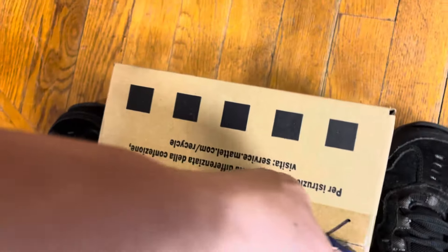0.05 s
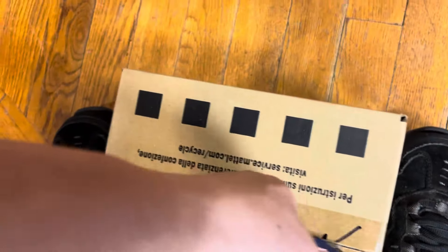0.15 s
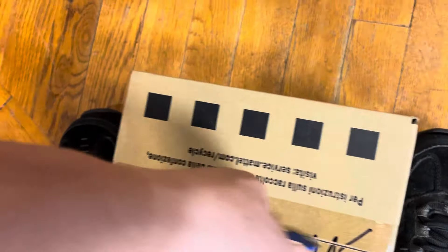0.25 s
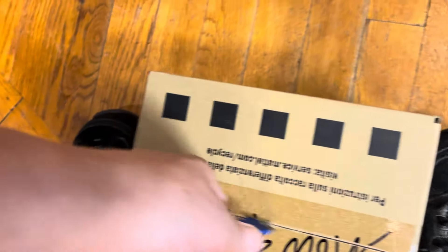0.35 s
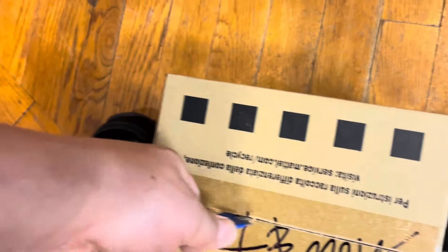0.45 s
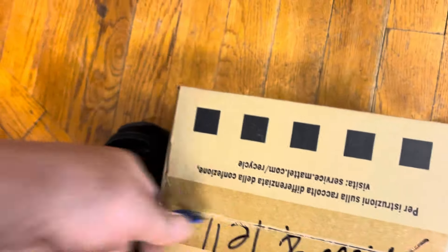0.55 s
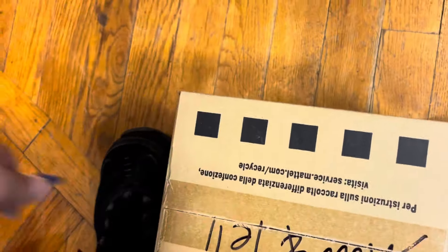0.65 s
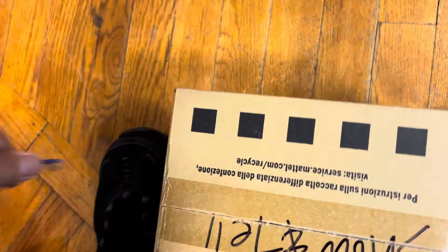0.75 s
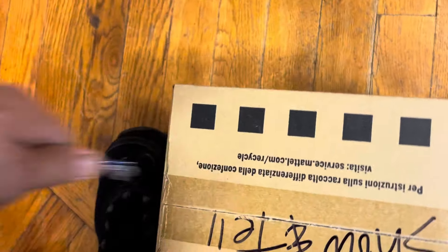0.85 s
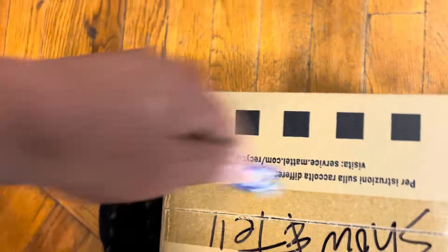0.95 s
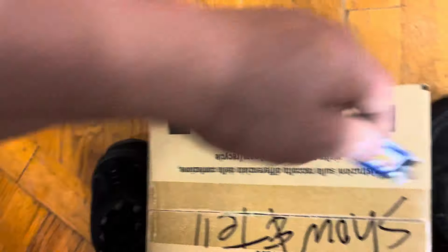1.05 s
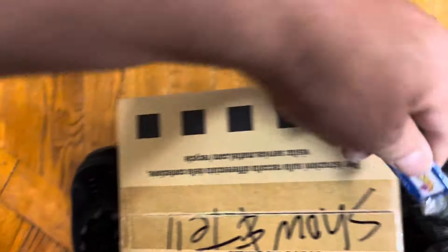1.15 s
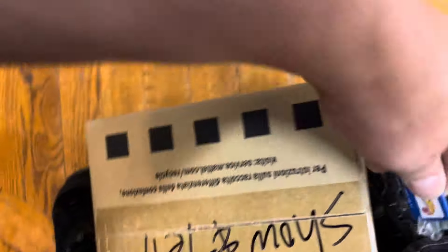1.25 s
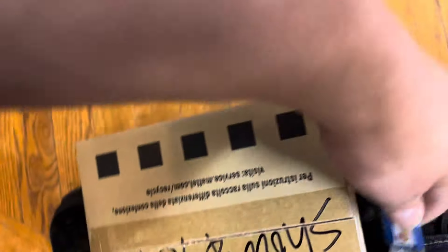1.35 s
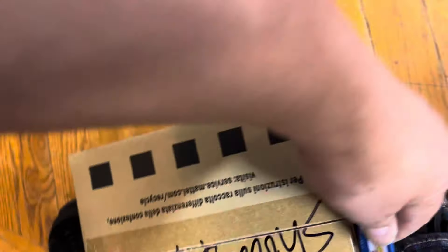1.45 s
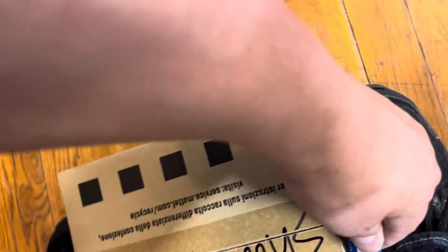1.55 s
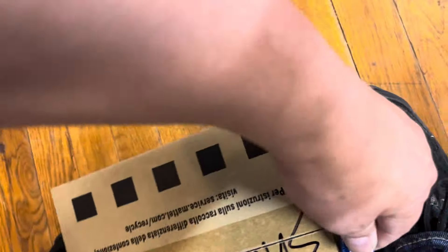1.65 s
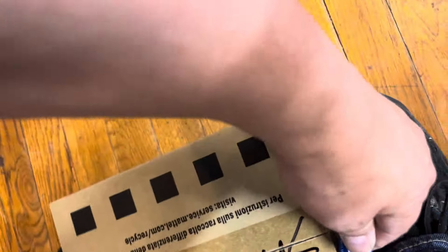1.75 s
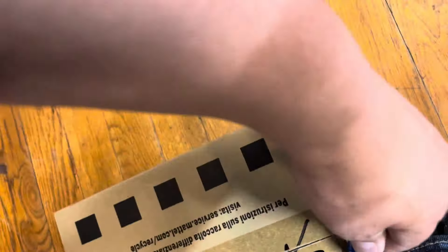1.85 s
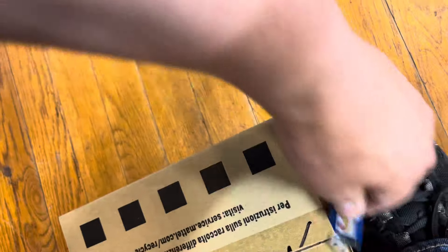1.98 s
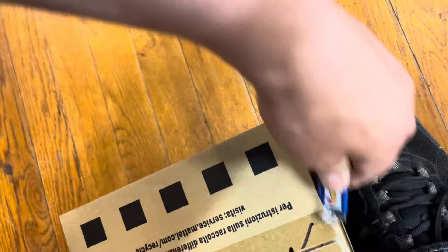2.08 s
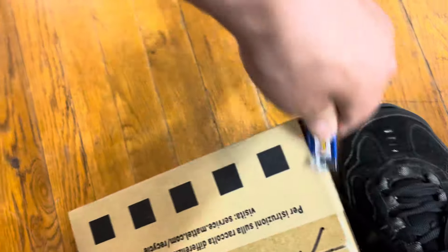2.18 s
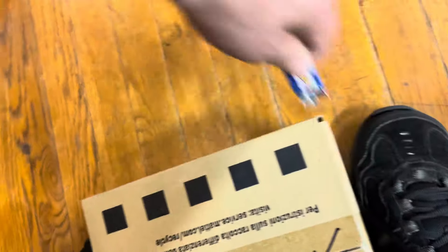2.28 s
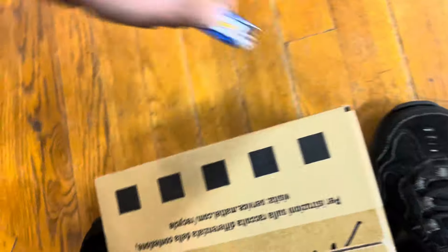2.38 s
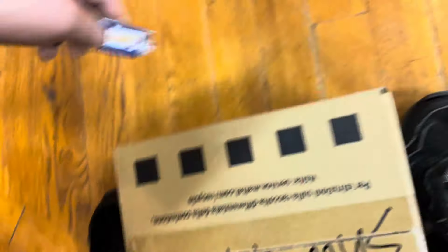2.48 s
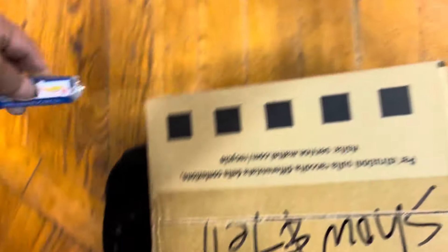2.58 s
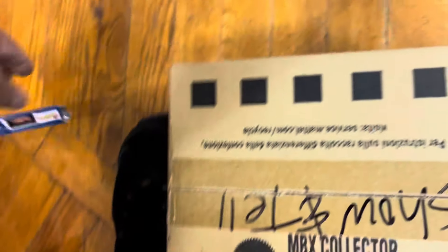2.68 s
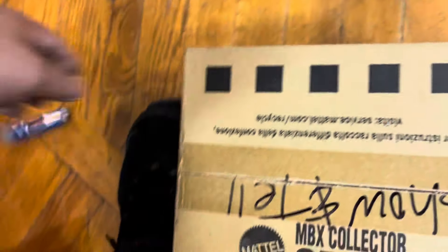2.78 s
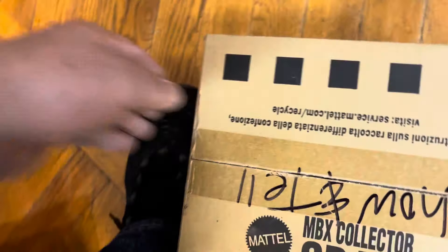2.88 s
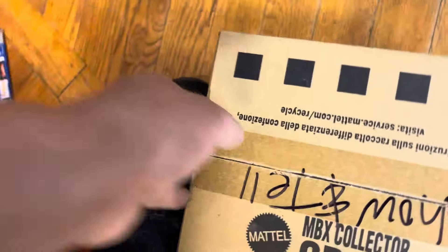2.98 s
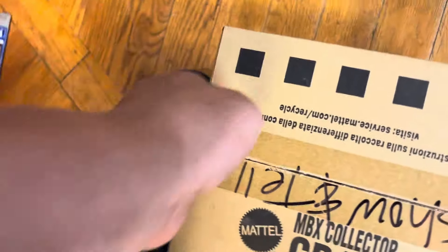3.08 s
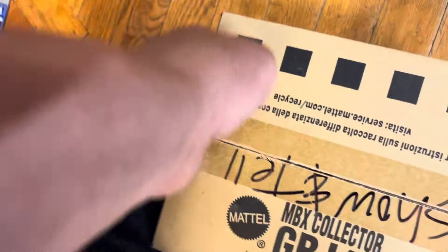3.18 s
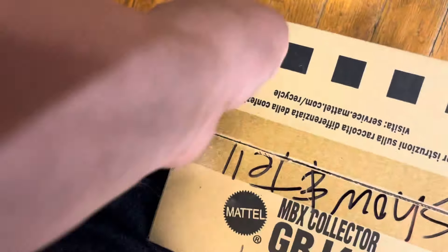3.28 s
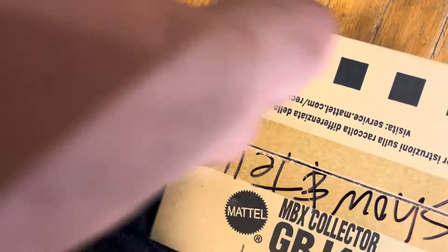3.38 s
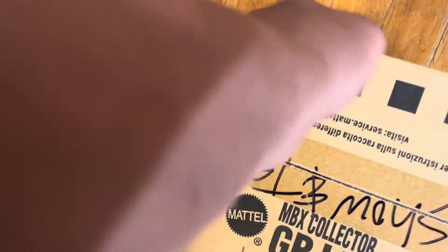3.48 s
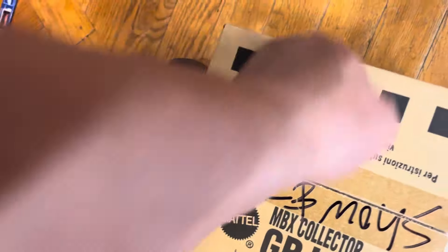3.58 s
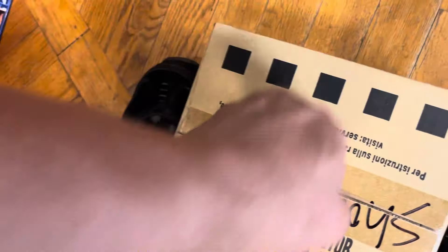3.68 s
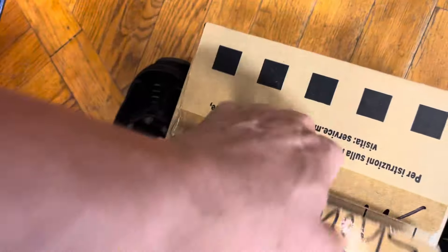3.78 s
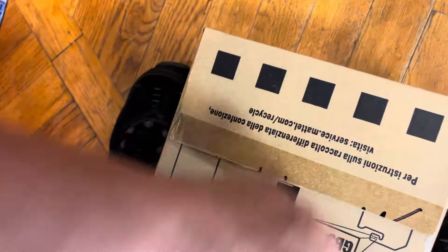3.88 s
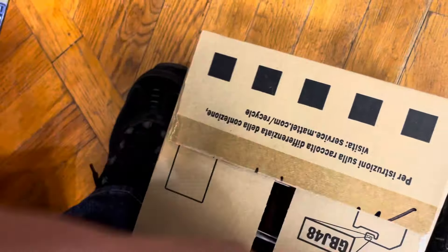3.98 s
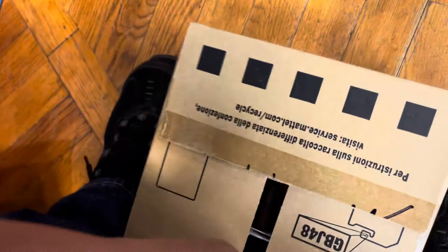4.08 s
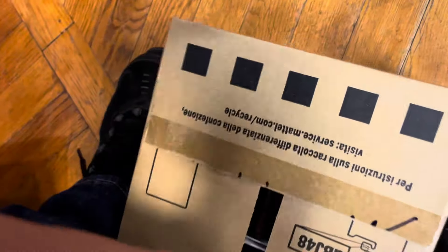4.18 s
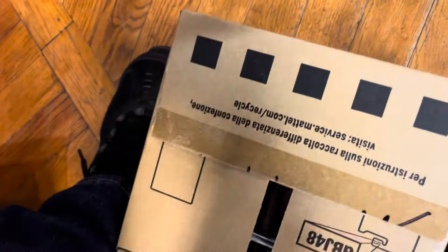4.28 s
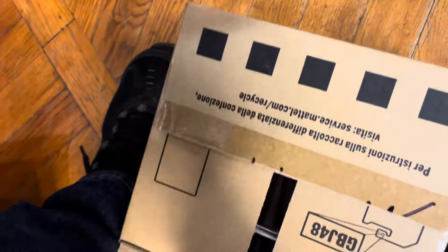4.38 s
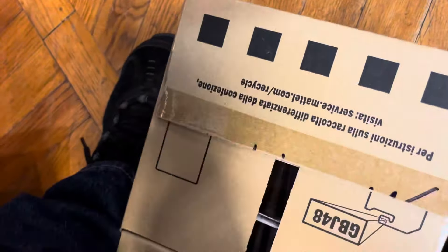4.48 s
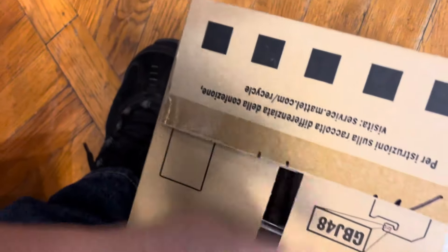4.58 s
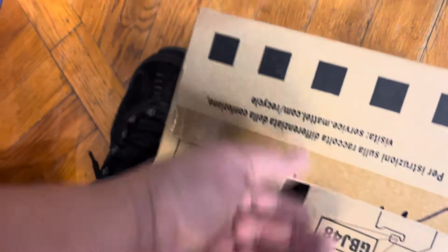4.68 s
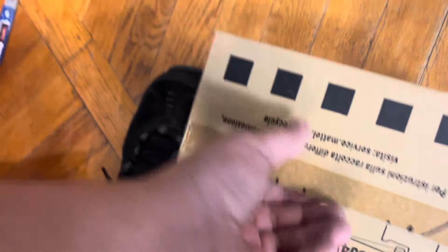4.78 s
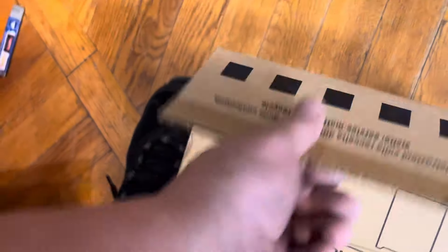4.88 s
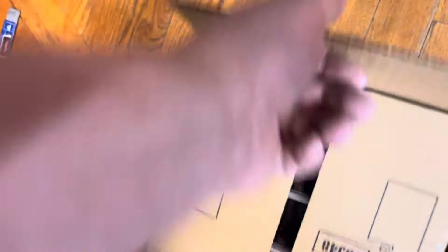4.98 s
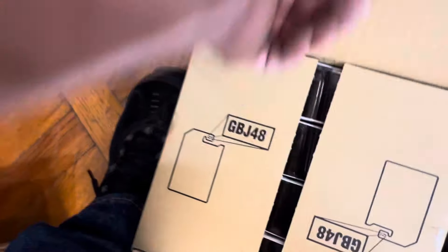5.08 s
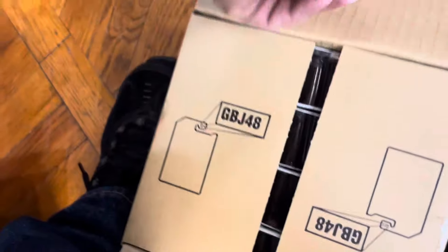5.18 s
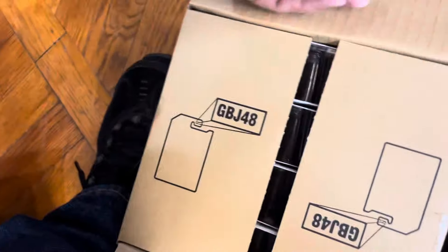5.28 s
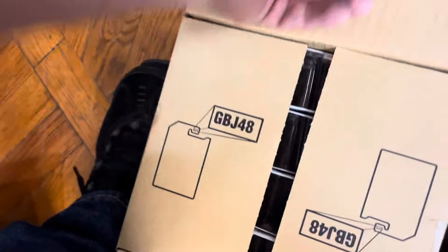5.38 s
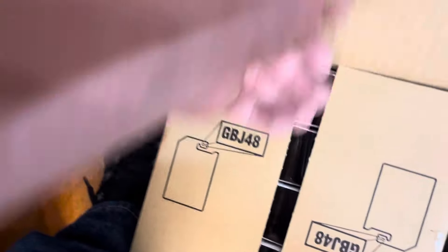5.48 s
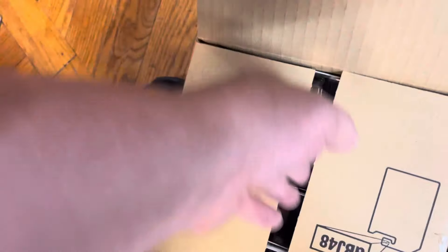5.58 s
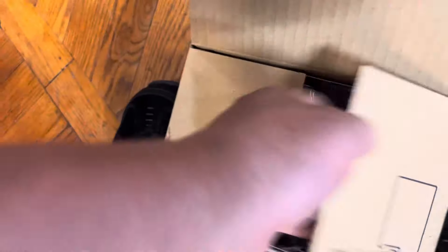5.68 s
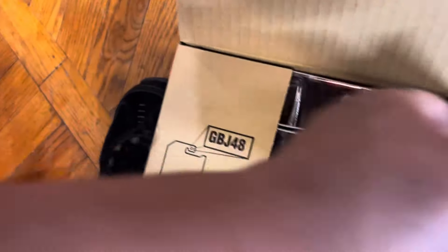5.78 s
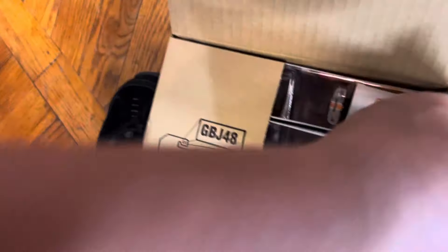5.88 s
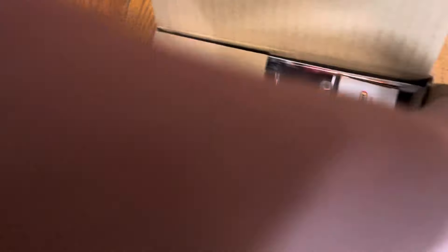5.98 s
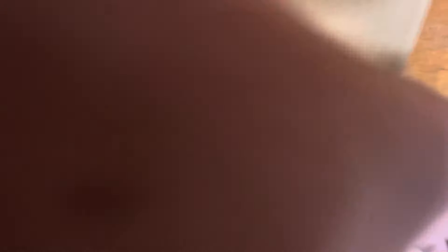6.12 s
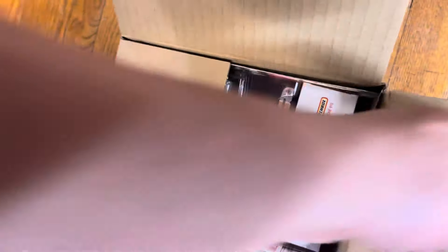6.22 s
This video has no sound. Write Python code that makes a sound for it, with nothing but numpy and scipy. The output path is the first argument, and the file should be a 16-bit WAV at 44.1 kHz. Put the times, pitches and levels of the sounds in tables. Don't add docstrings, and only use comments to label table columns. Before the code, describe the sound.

A short blade drags through carton tape with gritty scraping and sharp snaps, then hands tear and knock hollow cardboard flaps open in a quiet room.

```python
import sys
import numpy as np
from scipy import signal
from scipy.io import wavfile
from scipy.ndimage import uniform_filter1d

SR = 44100
rng = np.random.default_rng(int(sys.argv[2]) if len(sys.argv) > 2 else 0)


def wav_record(signal):
    frames = np.transpose(np.atleast_2d(signal))
    bounded = np.clip(frames, -1, 1)
    quanta = np.round(bounded * 32767).astype(np.int16)
    wavfile.write(sys.argv[1], SR, quanta)


def convert_level_to_amplitude(level_db):
    exponent = np.asarray(level_db, float) / 20
    return 10 ** exponent


N = 275620

# frequency in Hz, level in dB per Hz.
ROOM_TONE_DB_PER_HZ = [(18, -41), (30, -41), (43, -30), (68, 2), (93, -17), (122, -1), (148, -24.5),
                       (195, -16), (300, -26), (478, -50), (1140, -39.5), (1620, -26), (2270, -43.5),
                       (12600, -72.5), (16400, -72.5)]
# frequency in Hz, likeness from 0 to 1.
ROOM_TONE_LIKENESS = [(60, 1), (290, 0.76), (640, 0.3), (1400, 0.14), (3100, 0.23), (5500, 0.63),
                      (15000, 0.55)]

# frequency in Hz, width in Hz, level in dB.
CARTON_MODES = [(101.9, 16.6, 6), (139, 92, -2), (253, 88, 1.5), (277.6, 31.4, 4), (332, 35, -3.5),
                (412, 53, -5.5)]
# frequency in Hz, width in Hz, level in dB.
FLAP_MODES = [(543, 143, 4.5), (746, 108, 4.5), (947, 300, 0), (1280, 68, 3.5), (1480, 89, 0.5),
              (2590, 180, -17.5)]
# frequency in Hz, level in dB.
FIZZ_DB = [(1500, -58.5), (2000, -4), (2500, -1), (3200, 1), (4300, 1.5), (5600, -3.5), (7000, 0.5),
           (9000, -2), (12500, -6.5), (16000, -11.5), (16900, -39)]

# time in seconds, pressure in dB, lean into the hollow box in dB.
FIRST_CUT = [
    (0, -40, -0.5),
    (.15, -41.5, 3),
    (.23, -46, 14),
    (.31, -41.5, 14),
    (.42, -43.5, 16.5),
    (.5, -44, 9),
    (.59, -38, 9),
    (.625, -59, 17),
    (.96, -72.5, 12),
]
# time in seconds, pressure in dB, lean in dB.
SECOND_CUT = [
    (1.85, -63.5, 1),
    (1.95, -47, 7),
    (2.151, -41, 2),
    (2.268, -44.5, 11),
    (2.359, -70, 11),
    (2.739, -78, 21.5),
]
# time in seconds, pressure in dB, lean in dB.
HANDS = [(2.84, -46, 3), (2.95, -44.5, 8), (3.1, -61.5, 3), (3.25, -56.5, 12), (3.42, -59.5, -1),
         (3.58, -54.5, 13), (3.75, -59, 15.5), (3.98, -60.5, 8), (4.15, -50.5, 4), (4.471, -51, -12),
         (4.63, -57, 11.5), (5.2, -54.5, -12.5), (5.421, -53.5, -2), (5.46, -75, 17), (5.531, -94, 33),
         (5.701, -53, -7), (5.9, -46, -3), (6.25, -56.5, 4)]
# fizz over pressure in dB, top octave over fizz in dB.
DRAG_GRIT_DB = [
    (-5.5, -13),
    (-7.5, -13),
    (-3, -15),
]
# peak time in seconds, rise in seconds, fall in seconds, scrape in dB, squeak in Hz.
RUBS = [(0.29, 0.078, 0.017, -34.5, 3730), (1.584, 0.014, 0.003, -47, 800),
        (3.495, 0.055, 0.018, -57, 3600), (4.375, 0.027, .03, -28, 540), (4.57, 0.026, 0.025, -36.5, 1560),
        (4.3, 0.057, 0.023, -42, 550), (4.4, 0.013, 0.015, -35, 890), (2.252, .015, 0.02, -37, 480),
        (2, 0.0051, 0.0079, -49, 1000), (0.247, 0.055, 0.025, -38, 680), (5.78, 0.013, 0.011, -44, 1300),
        (6.191, 0.0083, 0.028, -51, 1070), (2.009, 0.041, 0.016, -45.5, 3800),
        (2.239, 0.02, 0.022, -63.5, 4170), (3.53, 0.003, 0.014, -39, 1000), (0.55, 0.04, 0.04, -38, 1300),
        (2.77, 0.025, 0.013, -46, 2600), (3.42, 0.056, 0.045, -58.5, 1520), (3.61, 0.015, .015, -60, 1350),
        (4.0, .04, 0.034, -64, 2000), (5.121, 0.0096, 0.017, -31, 1390), (5.843, 0.012, 0.014, -42, 1450),
        (3.69, 0.014, 0.013, -45.5, 4900), (4.99, 0.018, 0.07, -34.5, 2160),
        (5.558, 0.014, 0.023, -39, 2000), (5.601, 0.021, 0.013, -28, 4370),
        (5.648, 0.006, 0.014, -29.5, 6000), (5.98, .016, 0.0092, -22, 5900)]
# peak time in seconds, rise in seconds, fall in seconds, scrape in dB, squeak in Hz.
TEARS = [(.53, 0.05, 0.059, -32.5, 3050), (.59, 0.012, 0.0086, -33, 2600),
         (2.785, 0.028, 0.035, -31.5, 4780), (3.03, 0.031, 0.03, -48, 4600),
         (3.323, 0.064, 0.0072, -42.5, 6740), (3.838, 0.0089, 0.016, -33, 4640),
         (3.95, 0.043, 0.013, -42.5, 3470), (4.271, 0.041, 0.062, -41.5, 3300),
         (4.385, 0.025, 0.043, -32.5, 2530), (4.565, 0.04, 0.022, -35, 2520),
         (2.905, 0.012, 0.017, -38, 2200), (4.8, 0.0085, 0.044, -28, 3320),
         (5.127, 0.0096, 0.026, -26.5, 2660), (5.26, 0.03, 0.038, -49, 4500),
         (5.43, 0.032, 0.0042, -50.5, 4420), (5.834, 0.0045, 0.021, -43, 2700),
         (6.025, 0.014, 0.014, -25, 2570), (6.099, 0.023, 0.019, -45, 3280)]

# time in seconds, peak in dB, ringing in Hz.
BLADE_SNAPS = [(.2743, -35, 3850), (0.3381, -11, 4900), (0.369, -25, 3380), (0.4856, -19, 3460),
               (0.5942, -15, 2470), (0.9211, -26, 4370), (1.3172, -42, 4070), (1.358, -42, 3370),
               (1.416, -37.5, 4350), (1.5865, -29, 4470), (1.652, -35.5, 3650), (1.675, -32.5, 4640),
               (1.7015, -47, 3150), (1.874, -17, 4600), (1.9038, -32, 5070), (1.938, -16.5, 4900),
               (1.9839, -31, 2890), (1.998, -34, 3570), (2.011, -22.5, 4740), (2.0357, -29.5, 4350),
               (2.2098, -8, 2810), (2.2902, -34.5, 3300), (2.465, -40, 6470), (2.7775, -5, 4560),
               (2.8887, -5.5, 6320), (2.969, -9.5, 5100)]
# time in seconds, peak in dB, ringing in Hz.
BOARD_SNAPS = [(3.032, -25, 4630), (3.068, -38.5, 3060), (3.1143, -47, 2640), (3.2874, -30, 3240),
               (3.3651, -29.5, 3500), (3.526, -41, 3160), (3.5318, -36, 3440), (3.608, -38, 2580),
               (3.6264, -35.5, 3230), (3.7666, -20, 4550), (3.826, -29.5, 4400), (3.8513, -34, 2530),
               (3.913, -25, 2560), (4.0248, -34, 3300), (4.3584, -34, 2600), (4.368, -27, 2670),
               (4.7022, -24, 2530), (4.7757, -26, 2420), (4.8007, -16.5, 3060), (5.0395, -22, 2400),
               (5.1264, -12.5, 4700), (5.5422, -31.5, 2420), (5.9687, -5, 2430), (5.9758, -8, 5900),
               (5.98, -6, 5300), (6.033, -17.5, 2780)]
# time in seconds, peak in dB, ringing in Hz.
TAPE_SNAPS = [(0.445, -28, 2420), (1.8645, -38, 4350), (2.064, -19.5, 4630), (2.258, -30, 6300),
              (2.75, -4.5, 4370), (2.7645, -6, 4460), (3.01, -20.5, 4430), (3.263, -29.5, 2770),
              (3.31, -23.5, 6900), (3.889, -40, 6520), (4.0596, -32.5, 4600), (4.064, -39, 3770),
              (4.331, -41, 2490), (4.655, -26, 2480), (5.6502, -3.5, 7800)]
# time in seconds, peak in dB, ringing in Hz.
GLUE_TICKS = [
    (0.409, -28.5, 2400),
    (1.529, -39, 4330),
    (2.045, -22.5, 4220),
    (2.435, -36.5, 7000),
    (2.4845, -33, 4300),
    (4.178, -57, 2520),
    (6.07, -25, 2600),
]
SNAP_TOP_DB = (-13.5, -21.5, -5.5, 10.5)
# time in seconds, peak in dB, ringing in
# Hz.
CLICKS = [(.0737, -33, 2900), (1.531, -35, 4300), (1.939, -22, 3700), (3.308, -32, 2700),
          (3.328, -36, 3800), (3.626, -30, 2870), (3.853, -33, 4600), (3.386, -38, 2950),
          (3.497, -42, 4500), (3.692, -38, 3800), (3.95, -37, 3600), (4.068, -37, 4300)]
# time in seconds, peak in dB, ringing in Hz.
CRACKLES = [(1.656, -34, 3400), (2.8, -17, 2210), (3.29, -41, 5000), (3.35, -46, 3200), (3.384, -43, 3000),
            (3.525, -35, 3020), (3.837, -38, 4300), (4.2377, -31, 3240), (4.292, -42, 2560),
            (4.3709, -15, 2580), (4.386, -21.5, 2520), (4.5067, -36, 2510), (4.808, -20, 3060),
            (4.978, -40, 2260), (5.0952, -41, 2420), (5.1152, -38, 2230), (5.1202, -17, 2530),
            (5.139, -38, 3000)]

# time in seconds, knock peak in dB,
# boom in dB, knock pitch in Hz.
KNOCKS = [(.261, -15, -26, 563.5), (.318, -22, -24, 544), (.336, -10, -12.5, 576),
          (0.361, -20, -19, 600), (.441, -14, -25.5, 570), (0.485, -13, -36, 590),
          (0.592, -7, -10.5, 543), (0.883, -41.5, -48, 946), (0.924, -26, -41.5, 1016),
          (1.421, -33.5, -25, 616), (1.51, -31, -40, 640), (1.587, -13.5, -23.5, 700),
          (1.877, -31.5, -44, 920), (1.906, -40.5, -45, 565), (1.938, -20.5, -42.5, 1010),
          (2.012, -25.5, -28, 715), (2.211, -13.5, -30.5, 845), (2.237, -21.5, -26.5, 537),
          (2.75, -10.5, -22.5, 1515), (2.766, -7, -28, 1406), (2.889, -17, -23, 573),
          (3.265, -22, -22.5, 456), (3.364, -26, -25, 1220), (3.532, -25.5, -52, 954),
                (3.833, -22, -22.5, 820), (4.062, -36, -49, 1480), (4.331, -10, -26, 554),
                (4.371, -5, -17, 1430), (4.654, -8.5, -14, 880), (4.696, -16, -13, 543),
                (4.776, -14, -30.5, 746), (4.938, -23.5, -42, 814), (5.04, -10.5, -8, 1550),
                (5.12, -17, -20, 1280), (5.541, -20, -30, 780), (5.552, -15.5, -19, 697),
                (5.569, -21, -23, 640), (5.652, -3.5, -10.5, 1260), (5.968, -4.5, -18.5, 1320),
                (5.981, -10.5, -19, 1025), (6.034, -14.5, -14, 1480)]
# time in seconds, knock peak in dB, boom in dB, boom pitch in Hz.
THUMPS = [(0.389, -30, -25, 80.2), (2.775, -40, -23.5, 157), (2.97, -30.5, -31.5, 153.8),
          (3.291, -34, -29, 112), (3.313, -30, -25, 98), (3.643, -56, -33, 89), (3.698, -33, -24, 99),
          (3.768, -20.5, -32, 84), (3.852, -28, -24, 105.6), (3.918, -29.5, -25, 133),
          (4.178, -16, -19, 100), (5.0, -15, -14, 96.5), (5.406, -39, -35, 86), (5.73, -52, -36, 151),
          (5.885, -20, -18.5, 144)]
# time in seconds, knock peak in dB, boom in dB, knock pitch in Hz.
TAPS = [(1.534, -39, -45, 445), (1.656, -36, -45.5, 780), (2.778, -24, -24, 1460), (2.86, -29, -49, 1370),
        (2.973, -26, -44, 1370), (2.99, -52, -56, 1450), (3.01, -27, -38.5, 1430), (3.035, -33, -48, 1450),
        (3.247, -33, -41, 450), (3.289, -26.5, -28, 790), (3.316, -27, -36, 700), (3.35, -36, -34, 546),
        (3.484, -35, -61, 746), (3.597, -38, -43, 668), (3.626, -33, -47, 795), (3.667, -30, -51, 445),
        (3.681, -28, -32, 598), (3.692, -30, -39, 880), (3.789, -40, -38, 635), (3.801, -43, -46, 1250),
        (3.914, -23, -33, 1359), (4.027, -36, -53, 1140), (4.179, -14.5, -27.5, 500),
        (4.388, -13.5, -41, 808), (4.704, -14.5, -24.5, 606), (5.15, -23.5, -29.5, 867),
        (5.653, -12, -47, 1996), (5.705, -31, -40, 764), (5.73, -28.5, -49, 810), (5.772, -33, -44, 1240),
        (5.838, -26, -60, 1450), (5.883, -10.5, -20, 500), (5.94, -28, -37, 825), (5.95, -29, -36, 600),
        (6.033, -6.5, -30, 2330), (6.169, -41, -43, 910)]
# time in seconds, knock peak in dB, boom in dB, knock pitch in Hz.
SECOND_TAPS = [(.281, -20, -34, 720), (.503, -21, -33, 520), (1.511, -33, -50, 900),
               (1.938, -24, -50, 1300), (3.529, -23, -30, 1000), (3.833, -27, -45, 1250),
               (4.178, -18, -24, 1150), (4.372, -9, -40, 560), (4.805, -22, -50, 1600),
               (5.041, -13, -30, 560), (5.653, -11, -40, 500), (1.587, -19, -40, 1100),
               (4.331, -17, -45, 1350), (4.702, -16, -30, 1150), (4.799, -17, -40, 700),
               (4.938, -30, -55, 1350), (4.999, -24, -40, 1300), (5.117, -18, -40, 1280),
               (5.6, -28, -24, 1000), (5.678, -30, -23, 800)]
# time in seconds, boom pitch in Hz.
HOLLOW_HZ = [(.335, 270), (.361, 246), (.441, 367), (.592, 260), (1.42, 280), (2.239, 275), (2.753, 333),
             (2.888, 340), (3.265, 242), (3.367, 288), (3.53, 409), (3.833, 262), (4.329, 396), (4.37, 386),
             (4.655, 306), (4.697, 340), (4.776, 247), (5.041, 303), (5.124, 231), (5.552, 257),
             (5.652, 283), (5.967, 350), (5.98, 248), (6.033, 350)]

# frequency in Hz, T60 in seconds.
ROOM_T60_S = [(100, 0.22), (500, 0.14), (2000, 0.11), (8000, 0.11)]
# frequency in Hz, left minus right in dB.
PORT_DB = [(120, 0.5), (330, -0.5), (500, 0), (770, -7.5), (1170, -4), (1790, 1), (2740, 3.5), (4190, 2.5),
           (6000, 0)]
# frequency in Hz, lead of the left port in radians.
PORT_TURN_RAD = [(0, 0), (500, -.2), (1100, .6), (2500, .5), (4800, .35), (5600, -.9), (6800, -1.4),
                 (7600, -3.07), (9000, -3.21), (10200, -5), (11300, -6.15), (12500, -6.4), (13600, -7.6),
                 (14500, -9.33), (17000, -9.45)]
# time in seconds, extra middle-band phase in radians.
SWAY_RAD = [(0, 0.21), (1.9, 0.76), (2.9, 1), (3.6, 0.13), (4.6, 0.54), (5.5, 0.35), (6.0, 0.75)]

LEAD = 600


def evened(x):
    return x / np.sqrt(np.mean(x ** 2) + 1e-20)


def peaked(x):
    return x / (abs(x).max() + 1e-12)


def read(points, hz):
    f, value = np.transpose(points)
    return np.interp(np.log(hz + 1), np.log(f + 1), value)


def add(mix, s, sound):
    part = mix[round(s * SR):][:len(sound)]
    part += sound[:len(part)]


def no_bass(x, hz):
    return signal.sosfilt(signal.butter(2, hz, "high", fs=SR, output="sos"), x)


def no_treble(x, hz):
    return signal.sosfilt(signal.butter(2, hz, fs=SR, output="sos"), x)


def top_of(x):
    return signal.sosfiltfilt(signal.butter(2, 8300, "high", fs=SR, output="sos"), x)


def ring(x, modes):
    out = 0
    for k, (hz, width_hz, db) in enumerate(modes):
        pole = np.exp((-np.pi * width_hz + 2j * np.pi * hz) / SR)
        mode = signal.lfilter([1], [1, -pole], x).imag
        out = out + (-1) ** k * convert_level_to_amplitude(db) * (1 - abs(pole)) * mode
    return out


def causal(points):
    log_gain = np.log(convert_level_to_amplitude(read(points, abs(np.fft.fftfreq(2048, 1 / SR)))))
    phase = -signal.hilbert(log_gain).imag
    return np.fft.ifft(np.exp(log_gain + 1j * phase)).real[:512]


def clumps(seconds):
    size = int(seconds * SR)
    drift = uniform_filter1d(rng.standard_normal(N), size=size)
    return evened(uniform_filter1d(drift, size=size))


def patchy(x, depth_db, bins, frames=24):
    z = signal.stft(x, nperseg=256, noverlap=192)[2]
    field = rng.standard_normal(z.shape[::-1]).T
    for _ in range(2):
        field = uniform_filter1d(field, size=int(bins), axis=0)
        field = uniform_filter1d(field, size=frames, axis=1)
    z = z * convert_level_to_amplitude(depth_db * evened(field))
    return evened(signal.istft(z, nperseg=256, noverlap=192)[1][:N])


def room_tone(level_db=-47.5, swell_db=2.5):
    frames, hz = N // 512 + 5, np.fft.rfftfreq(2048, 1 / SR)
    a, b, c, d, patches = rng.standard_normal((frames, 1025, 5)).T
    patches = uniform_filter1d(patches, size=14, axis=0)
    patches = evened(uniform_filter1d(patches, size=8, axis=1))
    same = np.clip(read(ROOM_TONE_LIKENESS, hz), -1, 1)[:, None]
    left, other = a + 1j * b, c + 1j * d
    z = np.array([left, same * left + np.sqrt(1 - same ** 2) * other])
    z = z * convert_level_to_amplitude(read(ROOM_TONE_DB_PER_HZ, hz)[:, None] + swell_db * patches)
    return convert_level_to_amplitude(level_db) * evened(signal.istft(z, nperseg=2048, noverlap=1536)[1][:, :N])


def drag_levels(t, lean_dulls=0.12):
    drags = zip((FIRST_CUT, SECOND_CUT, HANDS), DRAG_GRIT_DB)
    rows = [point + grit for drag, grit in drags for point in drag]
    s, press_db, lean_db, fizz_db, top_db = np.transpose(rows)
    fizz_db = press_db + fizz_db - lean_dulls * lean_db
    levels_db = press_db, press_db + lean_db, fizz_db, fizz_db + top_db
    return [convert_level_to_amplitude(np.interp(t, s, db)) for db in levels_db]


def fibre_slips(slips_per_s=3500, spread_db=2.5, clump_db=1.7, smooth=0.57):
    size = convert_level_to_amplitude(spread_db * np.minimum(rng.exponential(1, N), 4)) * rng.choice([-1, 1], N)
    slips = evened(size * (rng.random(N) < slips_per_s / SR))
    slips = slips + smooth * rng.standard_normal(N)
    return slips * convert_level_to_amplitude(clump_db * clumps(0.0088))


def rubbing(squeak_db=9.5, boom_share_db=-3.5, rub_fizz_db=-4.5, tear_fizz_db=0.2):
    t = np.arange(N) / SR
    slips = fibre_slips()
    scrape = patchy(no_bass(ring(slips, FLAP_MODES), 460), depth_db=2.0, bins=2.7)
    boom = evened(no_bass(ring(slips * convert_level_to_amplitude(3.34 * clumps(0.0037)), CARTON_MODES), 73))
    fizz = patchy(signal.oaconvolve(slips, causal(FIZZ_DB))[:N], depth_db=3.5, bins=2)
    top = top_of(fizz)
    scrape_gain, boom_gain, fizz_gain, top_gain = drag_levels(t)
    out = scrape * scrape_gain + boom * boom_gain
    out = out + evened(fizz - top) * fizz_gain + evened(top) * convert_level_to_amplitude(12.5) * top_gain

    upper_boom = no_bass(boom, 170)
    strokes = [row + (rub_fizz_db,) for row in RUBS] + [row + (tear_fizz_db,) for row in TEARS]
    for peak_s, rise_s, fall_s, scrape_db, squeak_hz, fizz_db in strokes:
        near = slice(round((peak_s - .15) * SR), round((peak_s + .15) * SR))
        late = t[near] - peak_s
        pressure = np.exp(-(late / np.where(late < 0, rise_s, fall_s)) ** 2)
        top_share = convert_level_to_amplitude(14.5) * top_gain[near] / fizz_gain[near]
        squeak = fizz[near] + (top_share - 1) * top[near]
        squeak = squeak + ring(fizz[near], [(squeak_hz, 350, squeak_db)])
        body = scrape[near] + convert_level_to_amplitude(boom_share_db) * upper_boom[near]
        if squeak_hz < 1900:
            body = body + ring(scrape[near], [(squeak_hz, 170, 12.0)])
        stroke = convert_level_to_amplitude(scrape_db) * body + convert_level_to_amplitude(scrape_db + fizz_db - 5.0) * squeak
        add(out, t[near][0], pressure * stroke)
    return out


def burst(chance, length_s, tail_db, rise_s, tail_s=0.006):
    t = np.arange(chance.shape[1]) / SR
    run = chance[0] * np.exp(-(t / max(length_s, .0004)) ** 2) * convert_level_to_amplitude(1.3 * chance[1])
    rustle = convert_level_to_amplitude(tail_db) * chance[2] * np.exp(-t / tail_s)
    return (run + rustle) * (1 - np.exp(-t / rise_s))


def crack(row, chance, strain_s=0.003, strain_db=-23):
    s, peak_db, top_db, hz = row
    growth = np.exp((np.arange(LEAD) - LEAD) / SR / strain_s)
    strain = convert_level_to_amplitude(strain_db) * chance[0, -LEAD:] * growth
    length_s = .0022 * np.exp(.15 * chance[1, 2])
    fibres = np.append(strain, burst(chance, length_s, tail_db=-15.5, rise_s=0.00087))
    snap = np.convolve(fibres, causal([(800, -28.5)] + FIZZ_DB[1:]))[:len(fibres)]
    top = top_of(snap)
    scraps = [(hz, 300, 12.0)] + [(4200 * np.exp(0.35 * c), 260, 7.0) for c in chance[1, :2]]
    return convert_level_to_amplitude(peak_db) * peaked(snap - top + ring(snap, scraps) + convert_level_to_amplitude(top_db + 14.0) * top)


def all_snaps():
    kinds = zip((BLADE_SNAPS, BOARD_SNAPS, TAPE_SNAPS, GLUE_TICKS), SNAP_TOP_DB)
    return sorted((s, db, top_db, hz) for kind, top_db in kinds for s, db, hz in kind)


def spread(x, pole=0.8994, count=4):
    return signal.sosfilt([[-pole, 1, 0, 1, -pole, 0]] * count, x)


def knock(row, chance, boom_width_hz=44, knock_width_hz=100, uneven_db=3.5, away_db=15.0, boom_lag_s=0.0016):
    s, knock_db, boom_db, knock_hz, boom_hz = row
    t = np.arange(chance.shape[1]) / SR
    modes = []
    for (hz, width_hz, db), c in zip(FLAP_MODES, chance[1]):
        octaves = abs(np.log2(hz / knock_hz))
        if octaves > 1 / 8:
            modes.append((hz, 3.57 * width_hz, db + uneven_db * c - away_db * octaves))
    rise_s = 0.0016 if boom_hz < 200 else 0.00052
    blow = burst(chance, 0.0023, tail_db=-11.0, rise_s=rise_s)
    struck = abs(blow) * np.exp(-t * knock_hz * 4)
    panel = ring(blow, modes) + ring(struck, [(knock_hz, knock_width_hz, 18.0)])
    panel = no_treble(no_treble(panel, 3.04 * knock_hz), 3.04 * knock_hz)
    panel = peaked(no_bass(panel, 0.52 * knock_hz))

    push = np.exp(-((t - boom_lag_s) / 0.00048) ** 2)
    boom = ring(push, CARTON_MODES + [(boom_hz, boom_width_hz, 10.0)])
    boom = no_bass(no_bass(boom, 79), 39)
    boom = peaked(no_treble(boom, 1100))
    return spread(convert_level_to_amplitude(knock_db) * panel + convert_level_to_amplitude(boom_db + 5.0) * boom)


def hollow(knocks):
    return [row + (np.interp(row[0], *np.transpose(HOLLOW_HZ)),) for row in knocks]


def all_knocks(thump_panel_hz=673):
    thumps = [(s, knock_db, boom_db, thump_panel_hz, hz) for s, knock_db, boom_db, hz in THUMPS]
    return sorted(hollow(KNOCKS) + thumps)


def room(x):
    taps = np.zeros((2, SR // 2))
    at = np.arange(120, SR // 2 - 20, 20)
    at = at + rng.integers(0, 20, (2, len(at)))
    np.put_along_axis(taps, at, rng.choice([-1., 1.], at.shape), 1)
    hz, t, z = signal.stft(taps, SR, nperseg=256)
    apart = np.clip(np.minimum(.7 + hz / 900, (7000 - hz) / 1500), .07, 1)[:, None]
    z = np.array([z[0], apart * z[1] + np.sqrt(1 - apart ** 2) * z[0]])
    decay = convert_level_to_amplitude(-60 * t / np.maximum(read(ROOM_T60_S, hz), .02)[:, None])
    tail = signal.istft(z * decay, SR, nperseg=256)[1]
    return signal.fftconvolve(x[None], tail / np.linalg.norm(tail[0]), axes=1)[:, :N]


def scene():
    carton, lean = rubbing(), np.zeros(N)
    clicks = [(s, db, -18, hz) for s, db, hz in CLICKS]
    crackles = [(s, db, -41, hz) for s, db, hz in CRACKLES]
    groups = (all_knocks(), all_snaps()), (hollow(TAPS), crackles), (hollow(SECOND_TAPS), clicks)
    for knocks, snaps in groups:
        for row, chance in zip(knocks, rng.standard_normal((len(knocks), 3, 4000))):
            add(carton, row[0], knock(row, chance))
        for row, chance in zip(snaps, rng.standard_normal((len(snaps), 3, 4000))):
            snap = crack(row, chance)
            add(carton, row[0] - LEAD / SR, snap)
            add(lean, row[0] - LEAD / SR, np.sign(chance[1, 3]) * snap)
    lean = -convert_level_to_amplitude(-11) * (lean - .15 * top_of(lean))
    return carton + np.array([lean, -lean]) + convert_level_to_amplitude(-12) * room(carton) + room_tone()


def ports(x):
    hz, t, z = signal.stft(x, SR, nperseg=1024, noverlap=768)
    middle = np.exp(-(np.log((hz + 1) / 2200) / .8) ** 2) * (hz < 6500)
    sway = np.outer(middle, np.interp(t, *np.transpose(SWAY_RAD)))
    turn = np.interp(hz, *np.transpose(PORT_TURN_RAD))[:, None] + sway
    wander = evened(uniform_filter1d(rng.standard_normal(len(t)), size=16))
    turn = turn * (1 + .008 * np.outer(hz > 6500, wander))
    shade = convert_level_to_amplitude(read(PORT_DB, hz) * (hz < 6000) / 2)[:, None]
    half = shade * np.exp(.5j * turn)
    return signal.istft(z * np.array([half, 1 / half]), SR, nperseg=1024, noverlap=768)[1][:, :N]


def roll_off(x):
    return signal.sosfilt(signal.butter(12, 16520, fs=SR, output="sos"), x)


def record(dry):
    low_pass = signal.firwin(511, 16100, window=("kaiser", 9), fs=SR)
    heard = signal.oaconvolve(ports(dry), low_pass[None], "same")
    heard = heard / (1 + abs(heard) ** 6) ** (1 / 6)
    return roll_off(heard)


dry = scene()
out = record(dry)
wav_record(out)
```